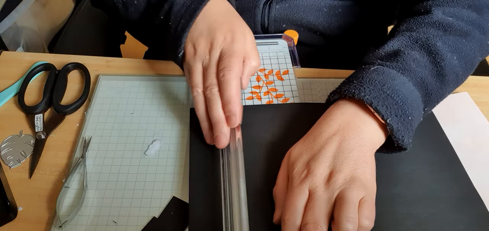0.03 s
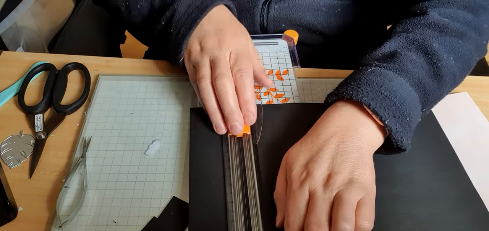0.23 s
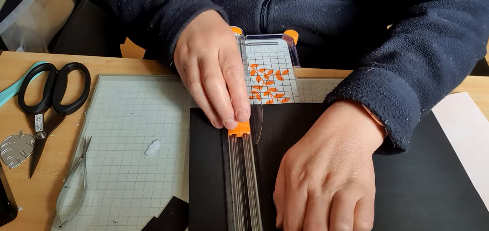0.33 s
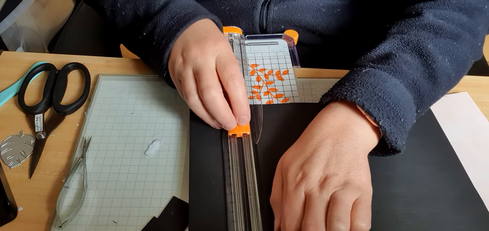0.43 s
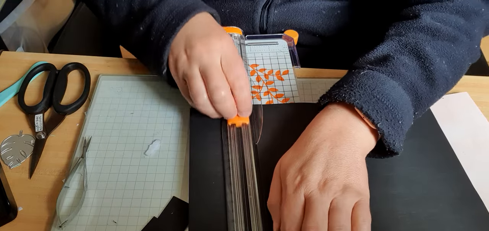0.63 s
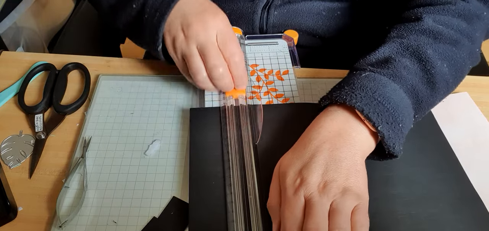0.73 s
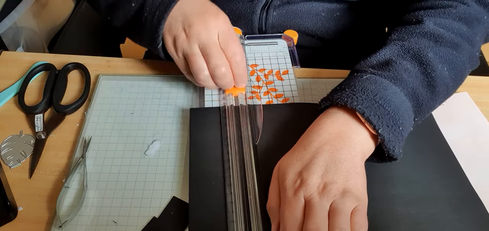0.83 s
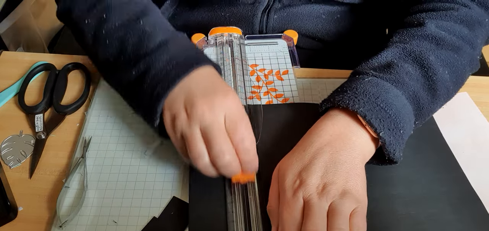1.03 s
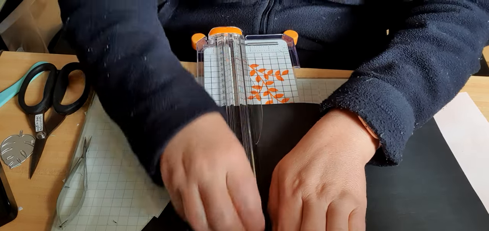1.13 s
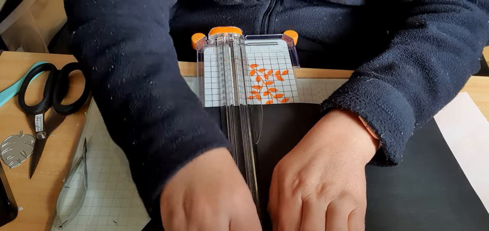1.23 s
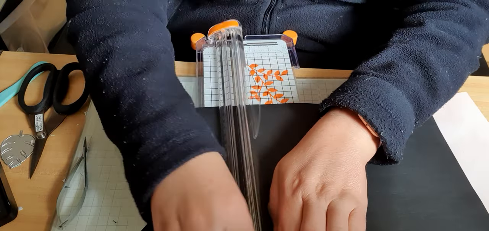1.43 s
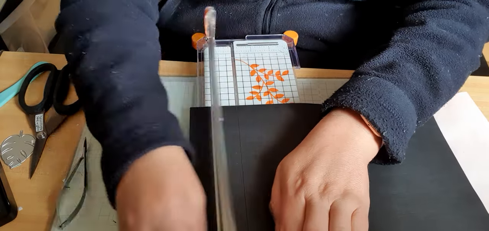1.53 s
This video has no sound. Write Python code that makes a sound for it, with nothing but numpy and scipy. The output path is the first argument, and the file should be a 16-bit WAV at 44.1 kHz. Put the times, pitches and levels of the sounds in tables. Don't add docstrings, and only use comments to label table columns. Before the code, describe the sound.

A plastic paper trimmer snaps shut with a loud crack and table thud, its cutter scrapes briefly to a stop, clicks down, then rasps back through cardstock to a knock, close-miked in a small room.

```python
import sys
import numpy as np
from scipy import signal
from scipy.fft import rfft, irfft, next_fast_len
from scipy.io import wavfile
from scipy.ndimage import map_coordinates

SR = 44100
rng = np.random.default_rng(int(sys.argv[2]) if len(sys.argv) > 2 else 0)


def pcm_store(signal):
    levels = np.round(np.clip(np.atleast_2d(signal), -1, 1) * 32767)
    wavfile.write(sys.argv[1], SR, levels.astype(np.int16).T)


def decibels_to_gain(level_db):
    exponent = np.asarray(level_db, float) / 20
    return 10 ** exponent


N = 70560

# pitch_hz, level_db (rms)
HUM = [(77, -53.5), (86, -71), (228, -67)]
# freq_hz, level_db (per Hz)
AIR = [(30, -14), (100, 2.5), (250, -17.5), (600, -28), (900, -18), (1500, -21.5), (5000, -29),
       (15000, -44.5)]
# freq_hz, likeness (-1..1)
AIR_ALIKE = [(60, 0.93), (240, 0.72), (950, 0.72), (3800, -0.097), (15000, 0.03)]
# time_s, level_db
AIR_LEVEL = [(0, -53), (.12, -52), (.17, -61.5), (.22, -54), (.4, -51), (.5, -50.5), (.56, -53), (1.4, -58.5),
             (1.6, -52)]

# freq_hz, t60_s
ROOM_DECAY = [(100, 0.32), (800, 0.27), (3000, 0.33), (7000, 0.29), (14000, 0.23)]
# freq_hz, level_db
ROOM_COLOUR = [(60, -3.5), (300, -3), (630, 3), (1000, -3), (4000, 0), (9000, -5.5), (16000, -0.5)]
# freq_hz, likeness (-1..1)
ROOM_ALIKE = [(100, 1), (600, 0.47), (1500, 0), (4000, 0)]
ROOM_DB, ROOM_DELAY_S = -6, 0.004
NEAR_DB, NEAR_S, NEAR_HZ, POSES = -3.5, 0.004, 1800, 32
# freq_hz, level_db
PORT_TILT = [(200, 1), (1000, -0.5), (3000, -1), (9000, -7.5), (15000, -5.5)]
PORT_LAG_S = 5.5e-5

# start_s, level_db
SWAYS = [(0.235, -17.5), (0.316, -32), (.585, -53), (0.733, -48), (1.31, -34), (1.458, -28.5), (1.5, -28)]
# pitch_hz, level_db, t60_s
LEGS = [(45.4, -22, 0.089), (61, 7.5, 0.087)]
# start_s, level_db
LIFTS = [(1.492, -37.5), (1.4943, -55), (1.5795, -54), (1.5865, -48)]
# pitch_hz, level_db, t60_s
HINGE = [(1050, 9, 0.018), (1180, -5, 0.01), (2077, -5, 0.021), (2860, -1, 0.011), (3020, -4, 0.015),
         (3350, -7, 0.01), (4630, -13, 0.018), (6500, -15, 0.0092), (8550, -18.5, 0.0096)]
SWAY_RISE_S = 0.021

STEEL_START_S, STEEL_HZ, STEEL_BEAT_HZ, STEEL_PAIR_DB = 1.364, 8520, 30, -8
STEEL_DB, STEEL_T60_S = -45, 0.3

# start_s, crack_db, brightness_db, base_db, thud_db
CONTACTS = [(0.218, -16, 5, -19.5, -9), (0.2197, -7.5, 12, -0.5, -31.5), (.227, -12.5, -1.5, -51, -38),
            (.243, -19.5, 13, -19, -24), (0.572, -41, -2, -45, -41), (0.5761, -43, -9, -38.5, -50),
            (0.7242, -30, 3, -50, -66), (0.7284, -32, -20, -45, -24.5), (0.746, -43, -19, -54, -27.5),
            (.759, -36, -21, -22, -30), (0.7634, -48, -9, -30, -27), (0.851, -45, -20, -42, -36),
            (.903, -36, -16, -37, -31.5), (.909, -32.5, 11, -26.5, -40), (0.923, -45, -14, -45, -24.5),
            (.937, -44, 15, -40, -52), (0.989, -37, -15, -24.5, -26), (1.001, -40, -5, -43, -26),
            (1.2858, -43, -10, -42, -25), (1.2935, -20, -1.5, -62, -40), (1.298, -24.5, -16, -24, -35),
            (1.364, -49, 20, -53, -84), (1.427, -67, -8, -60, -40.5), (1.511, -65, -9, -60, -40),
            (1.4919, -50, -11, -66, -68.5), (1.579, -47, 4, -60, -54)]
# freq_hz, level_db (per Hz)
CRACK = [(700, -34), (1300, 1.5), (2100, -10), (2800, -2.5), (3700, 1.5), (5300, -0.5), (7500, -7.5),
         (15800, -33.5)]
# pitch_hz, level_db, t60_s
BASE = [(860, -25, 0.014), (897, 3, 0.027), (1027, -8, 0.017), (1186, -8.5, 0.035), (1279, -0.5, 0.017),
        (1542, -11, 0.026), (2030, -9, 0.028), (2167, -5, 0.024), (2667, -18.5, 0.049), (5150, -17, 0.021)]
# pitch_hz, level_db, t60_s
TABLE = [(111, -3.5, 0.091), (151.3, -6.5, 0.069), (187.6, 5.5, 0.061), (281.6, -11.5, 0.077),
         (382.1, -13, 0.19), (515.5, -13.5, 0.088)]
CRACK_DB, BASE_DB, THUD_DB = 4.5, -1.5, 0.5
CRACK_T60_S, CRACK_RISE_S, BASE_RISE_S, THUD_RISE_S = 0.009, 0.0002, 0.0013, 0.0084
SCATTER_DB, DETUNE = 1.2, 0.006

# start_s, level_db, pitch_hz, t60_s
KNOCKS = [(0.571, -35.5, 880, 0.037), (.579, -39.5, 800, 0.043), (0.581, -33, 108.4, 0.083),
          (0.7257, -22, 1138, 0.028), (0.7292, -15.5, 143, 0.042), (0.7437, -27, 1045, .035),
          (.7597, -22, 203, .035), (.7632, -18, 934, 0.02), (.7632, -35, 2275, .04),
          (.774, -27, 852, 0.063), (0.7793, -23, 192, 0.06), (.81, -33.5, 1264, 0.025),
          (0.9041, -26.5, 1210, 0.026), (0.91, -28.5, 4160, 0.019), (0.9101, -25.5, 1097, 0.049),
          (.918, -25.5, 1050, 0.029), (.9265, -23, 787, 0.031), (0.9363, -24, 1120, 0.029),
          (.988, -25.5, 1240, 0.022), (1.01, -43, 1280, 0.037), (1.282, -28, 1000, 0.033),
          (1.2855, -16, 223, 0.027), (1.2948, -23.5, 2040, 0.023), (1.2955, -19.5, 1016, 0.018),
          (1.2958, -14, 210, 0.036), (1.299, -28.5, 371, 0.13), (1.309, -29, 107, 0.081),
          (.7243, -9, 2900, .0022), (.658, -34, 872, .04), (.672, -31.5, 861, 0.072),
          (1.2936, -18, 3530, 0.009), (1.2932, -20, 5370, 0.0088), (1.304, -34, 1280, 0.029),
          (1.425, -44.5, 880, 0.029), (1.492, -47.5, 4500, .02), (1.4964, -35.5, 316, 0.02),
          (1.499, -45, 950, 0.065), (1.511, -40.5, 880, 0.048), (1.537, -46.5, 890, 0.056),
          (1.5789, -37, 3250, 0.017), (1.5818, -33, 3300, 0.0098), (1.582, -41.5, 1060, 0.051),
          (1.5985, -28.5, 238, .03)]
KNOCK_RISE_CYCLES = 0.27
BEAMED_HZ, BEAMED_DB = 1800, -12

# time_s, friction_db, rail_load_db (on the base), board_load_db (on the table), free_rail_ratio
STROKES = [
    [(.57, -57, 14.5, -15, 0.51), (.6, -61.5, 1, 0, 0.75), (.63, -52, -1.5, -2, 0.85),
     (.66, -47.5, -4.5, -15, 0.65), (.69, -47.5, -7, 0, 0.87), (.725, -45.5, -8, -2, 0.85),
     (.74, -58.5, 11, 15, 0.7), (.83, -74, 14, 24, 0.98)],
    [(.83, -78, 5, 19, 1), (.895, -60, 9, -4, 0.76), (.912, -51.5, 4, 10.5, 0.81),
     (.95, -48.5, -5.5, 5.5, 0.81), (.99, -58, 10, 1, 0.72)],
    [(.988, -44, 1, -4, 1.03), (1.05, -46, 5.5, -6, 0.97), (1.11, -45, 3, -11.5, 0.84),
     (1.17, -46.5, 5.5, -2, 0.74), (1.23, -47.5, 4, 2, 0.744), (1.275, -52, 9, 2.5, 0.74),
     (1.29, -57, 7, 30.5, 1)],
]
DULL_DB = [-5, -18.5, 0.5]
# freq_hz, level_db (per Hz)
SCRAPE = [(880, -9), (1500, -1), (2900, -10.5), (4560, -4), (7040, -10), (10600, -10), (15800, -23.5)]
# pitch_hz, width_hz, level_db
HELD_RAIL = [(796, 63, 6), (880, 30, 7), (1000, 100, -19), (1440, 65, -20)]
# pitch_hz, width_hz, level_db
FREE_RAIL = [(1260, 200, 0), (2900, 350, -5), (3500, 300, -7), (4300, 400, -9)]
# pitch_hz, width_hz, level_db
BOARD = [(109, 82, -4), (172, 72, 2.5), (288.8, 17, 1), (386, 49, -6)]
DULL_HZ, STROKE_EDGE_S = 5070, 0.006
GRAINS_PER_S, GRAIN_DB, GRAIN_SHARE, CHATTER_DB = 3200, 0.5, 0.25, 2.5
SCRAPE_DB, RAIL_DB, BOARD_DB, FREE_DB = 8.5, 5, 6.5, 0

NOTCH_HZ, NOTCH_WIDE_HZ, NOTCH_DB = 640, 60, -6
CEILING, TOP_HZ, TOP_EDGE_HZ = 0.9, 15920, 120


def unit(x):
    return x / np.sqrt(np.mean(x ** 2) + 1e-20)


def along(points, hz):
    f, v = np.transpose(points)
    return np.interp(np.log(hz + 1), np.log(f + 1), v)


def wobble(rate_hz):
    knots = rng.standard_normal(int(N * rate_hz / SR) + 4)
    return map_coordinates(knots, [np.arange(N) * rate_hz / SR])


def filtered(x, response):
    m = next_fast_len(x.shape[-1] + 8192)
    spectrum = rfft(x, m) * response(np.fft.rfftfreq(m, 1 / SR))
    return irfft(spectrum, m)[..., :x.shape[-1]]


def resonances(peaks):
    def response(hz):
        total = 0
        for k, (centre, width, db) in enumerate(peaks):
            damping = 1j * hz * width
            total = total + (-1) ** k * decibels_to_gain(db) * damping / (centre * centre - hz * hz + damping)
        return total
    return response


def gliding(x, peaks, ratio):
    hz, t, z = signal.stft(x, SR, nperseg=512, noverlap=384)
    ratio_now = np.interp(t * SR, np.arange(N), ratio)
    gain = np.abs(resonances(peaks)(hz[:, None] / ratio_now)) ** 2
    return signal.istft(z * gain, SR, nperseg=512, noverlap=384)[1][:N]


def pair(noise, spectrum, alike):
    def mid_and_side(hz):
        turn = np.arccos(np.clip(along(alike, hz), -1, 1)) / 2
        return decibels_to_gain(along(spectrum, hz)) * np.array([np.cos(turn), np.sin(turn)])
    mid, side = filtered(noise, mid_and_side)
    return unit(np.array([mid + side, mid - side]))


def ringing(modes, t, rise_s):
    hz, db, t60 = np.transpose(modes)[:, :, None]
    level_luck, pitch_luck = rng.standard_normal((2, len(modes), 1))
    decay = decibels_to_gain(db + SCATTER_DB * level_luck - 60 * t / t60)
    tones = decay * np.sin(2 * np.pi * hz * (1 + DETUNE * pitch_luck) * t)
    return tones.sum(0) * (1 - np.exp(-t / rise_s))


def strike(out, start_s, sound):
    return out + np.pad(sound, (round(start_s * SR), N))[:N]


def hum():
    out, t = np.zeros(N), np.arange(N) / SR
    for hz, db in HUM:
        level = np.sqrt(2) * decibels_to_gain(db + 2.1 * wobble(11.15))
        out += level * np.sin(2 * np.pi * hz * t + 0.63 * wobble(5.84))
    return out


def background_air():
    level_db = np.interp(np.arange(N) / SR, *np.transpose(AIR_LEVEL))
    air = pair(rng.standard_normal((2, N)), AIR, AIR_ALIKE)
    return decibels_to_gain(level_db + 1.2 * wobble(36)) * air


def room(x):
    hz, t, z = signal.stft(rng.standard_normal((2, SR // 2)), SR, nperseg=256)
    decay = decibels_to_gain(-60 * t / along(ROOM_DECAY, hz)[:, None])
    tail = signal.istft(z * decay, SR, nperseg=256)[1]
    tail = pair(tail, ROOM_COLOUR, ROOM_ALIKE)
    tail = tail / np.linalg.norm(tail[0])
    late = np.pad(x, (round(ROOM_DELAY_S * SR), 0))
    return decibels_to_gain(ROOM_DB) * signal.fftconvolve(late[None], tail, axes=1)[:, :N]


def near_reflections(x):
    t = np.arange(512) / SR
    echoes = rng.standard_normal((POSES, 2, len(t))) * np.exp(-t / NEAR_S)
    echoes = echoes / np.linalg.norm(echoes, axis=2, keepdims=True)
    place = np.arange(N) * (POSES - 1) / N
    back = np.zeros((2, N))
    for pose, echo in enumerate(echoes):
        fade = np.sqrt(np.clip(1 - np.abs(place - pose), 0, 1))
        back += signal.oaconvolve((x * fade)[None], echo, axes=1)[:, :N]
    return filtered(back, lambda hz: decibels_to_gain(NEAR_DB) / (1 + (NEAR_HZ / (hz + 1)) ** 4))


def at_ports(x):
    side = np.array([[0.5], [-0.5]])

    def response(hz):
        return decibels_to_gain(side * along(PORT_TILT, hz)) * np.exp(-2j * np.pi * hz * side * PORT_LAG_S)
    return filtered(x, response)


def table_sways():
    out, t = np.zeros(N), np.arange(SR // 2) / SR
    for start_s, db in SWAYS:
        out = strike(out, start_s, decibels_to_gain(db) * ringing(LEGS, t, SWAY_RISE_S))
    return out


def steel_part():
    t = np.clip(np.arange(N) / SR - STEEL_START_S, 0, None)
    tone = np.sin(2 * np.pi * STEEL_HZ * t)
    partner = np.sin(2 * np.pi * (STEEL_HZ + STEEL_BEAT_HZ) * t)
    return decibels_to_gain(STEEL_DB - 60 * t / STEEL_T60_S) * (tone + decibels_to_gain(STEEL_PAIR_DB) * partner)


def rail_lifts():
    out, t = np.zeros(N), np.arange(SR // 2) / SR
    for start_s, db in LIFTS:
        out = strike(out, start_s, decibels_to_gain(db) * ringing(HINGE, t, CRACK_RISE_S))
    return out


def knock_notes():
    direct, to_room, t = np.zeros(N), np.zeros(N), np.arange(SR // 2) / SR
    for start_s, db, hz, t60 in KNOCKS:
        note = ringing([(hz, db, t60)], t, KNOCK_RISE_CYCLES / hz)
        direct = strike(direct, start_s, note)
        to_room = strike(to_room, start_s, note * decibels_to_gain(BEAMED_DB * (hz > BEAMED_HZ)))
    return direct, to_room


def crack(t, colour, level_db):
    spit = unit(filtered(rng.standard_normal(len(t)), colour))
    burst = spit * decibels_to_gain(level_db - 60 * t / CRACK_T60_S) * (1 - np.exp(-t / CRACK_RISE_S))
    pulse = filtered(1.0 * (np.arange(len(t)) == 64), colour)
    return burst, pulse * np.linalg.norm(burst) / np.linalg.norm(pulse)


def contacts():
    rings, cracks, pulses = np.zeros((3, N))
    t = np.arange(SR // 2) / SR
    for start_s, crack_db, bright_db, base_db, thud_db in CONTACTS:
        colour = lambda hz: decibels_to_gain(along(CRACK, hz) + bright_db * np.log2(1 + hz / 4000))
        burst, pulse = crack(t, colour, crack_db + CRACK_DB)
        cracks = strike(cracks, start_s, burst)
        pulses = strike(pulses, start_s, pulse)
        rings = strike(rings, start_s, decibels_to_gain(base_db + BASE_DB) * ringing(BASE, t, BASE_RISE_S))
        rings = strike(rings, start_s, decibels_to_gain(thud_db + THUD_DB) * ringing(TABLE, t, THUD_RISE_S))
    return rings, cracks, pulses


def friction():
    caught = rng.random(N) < GRAINS_PER_S / SR
    grains = caught * rng.standard_normal(N)
    grains = grains * decibels_to_gain(GRAIN_DB * np.minimum(rng.exponential(size=N), 2))
    return np.sqrt(GRAIN_SHARE) * unit(grains) + np.sqrt(1 - GRAIN_SHARE) * rng.standard_normal(N)


def blade_scrape(rub, dull_db):
    def colour(hz):
        return decibels_to_gain(along(SCRAPE, hz) + dull_db / (1 + (DULL_HZ / (hz + 1)) ** 4))
    return decibels_to_gain(1.2 * wobble(61.35)) * unit(filtered(rub, colour))


def guide_rail(rub, free_ratio):
    chatter = rub * decibels_to_gain(CHATTER_DB * wobble(120))
    held = unit(filtered(chatter, resonances(HELD_RAIL)))
    free = unit(gliding(chatter, FREE_RAIL, free_ratio))
    low_cut = lambda hz: 1 / (1 + (680 / (hz + 1)) ** 8)
    return unit(filtered(held + decibels_to_gain(FREE_DB) * free, low_cut))


def table_board(rub):
    return unit(filtered(rub * decibels_to_gain(1.6 * wobble(40.1)), resonances(BOARD)))


def carriage():
    out, t = np.zeros(N), np.arange(N) / SR
    for rows, dull_db in zip(STROKES, DULL_DB):
        time_s, *columns = np.transpose(rows)
        level_db, rail_db, board_db, free_ratio = [np.interp(t, time_s, c) for c in columns]
        on = np.clip(np.minimum(t - time_s[0], time_s[-1] - t) / STROKE_EDGE_S, 0, 1)
        rub = friction()
        mix = decibels_to_gain(RAIL_DB + rail_db) * guide_rail(rub, free_ratio)
        mix += decibels_to_gain(BOARD_DB + board_db) * table_board(rub)
        mix += decibels_to_gain(SCRAPE_DB) * blade_scrape(rub, dull_db)
        out += on * decibels_to_gain(level_db) * mix
    return out


def scene():
    rings, cracks, crack_pulses = contacts()
    knocks, room_knocks = knock_notes()
    body = rings + rail_lifts() + table_sways() + carriage()
    direct = at_ports(body + cracks + knocks + steel_part())
    to_room = body + crack_pulses + room_knocks
    return direct + near_reflections(to_room) + room(to_room) + hum() + background_air()


def band_limit(x):
    return signal.sosfilt(signal.butter(12, 15920, fs=SR, output="sos"), x)


def record(dry):
    notch = lambda hz: decibels_to_gain(NOTCH_DB * np.exp(-((hz - NOTCH_HZ) / NOTCH_WIDE_HZ) ** 2))
    dip = filtered(dry, notch)
    soft = dip / (1 + np.abs(dip / CEILING) ** 4) ** (1 / 4)
    mix = filtered(soft, lambda hz: np.clip((TOP_HZ - hz) / TOP_EDGE_HZ, 0, 1))
    return band_limit(mix)


dry = scene()
out = record(dry)
pcm_store(out)
```